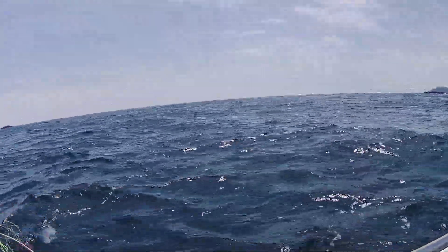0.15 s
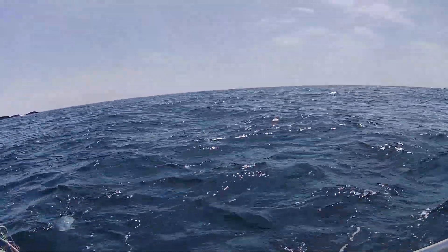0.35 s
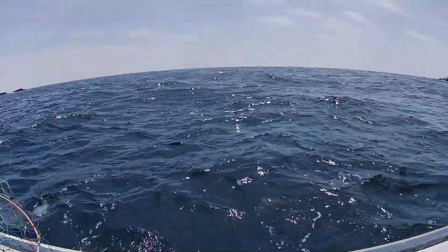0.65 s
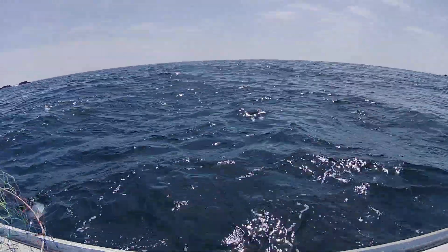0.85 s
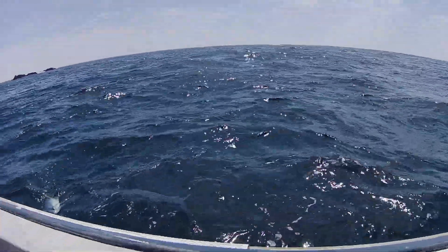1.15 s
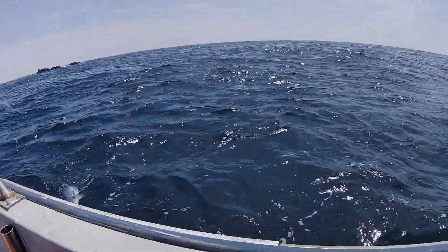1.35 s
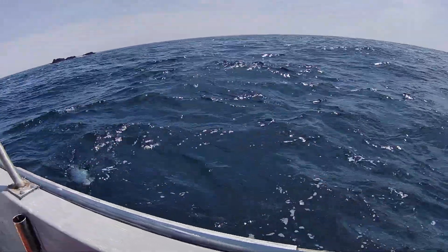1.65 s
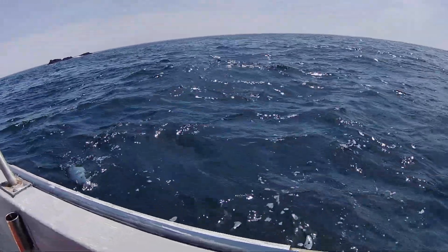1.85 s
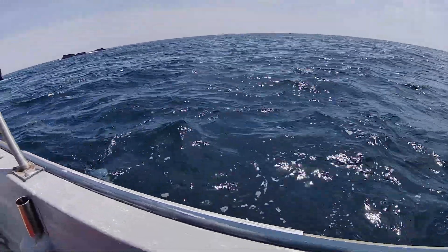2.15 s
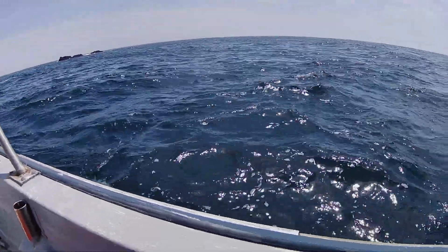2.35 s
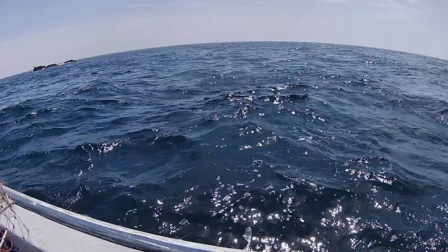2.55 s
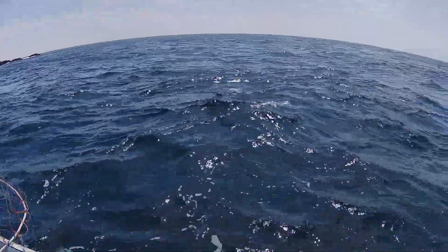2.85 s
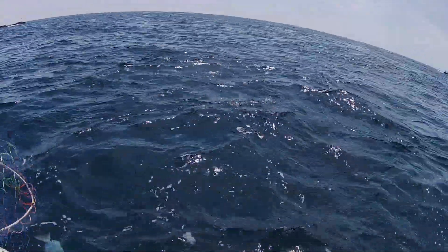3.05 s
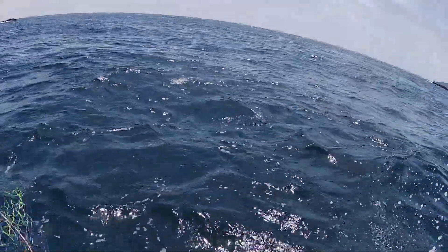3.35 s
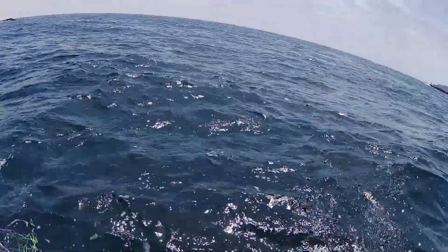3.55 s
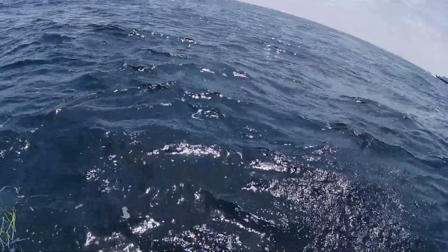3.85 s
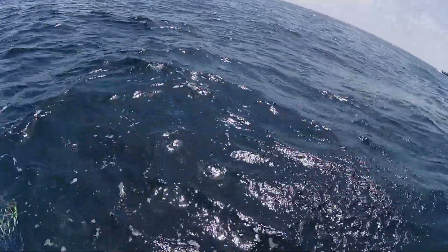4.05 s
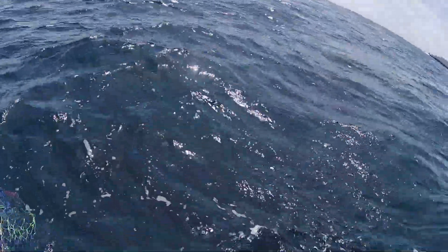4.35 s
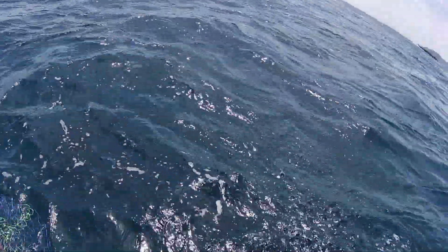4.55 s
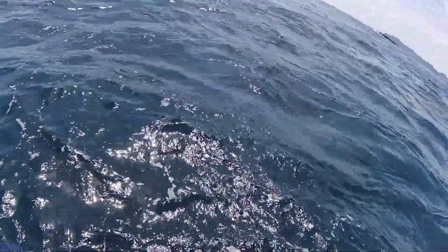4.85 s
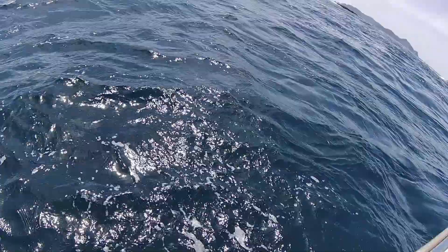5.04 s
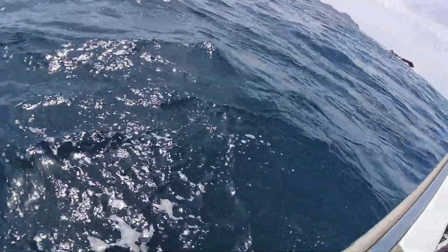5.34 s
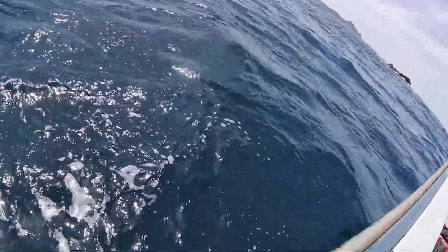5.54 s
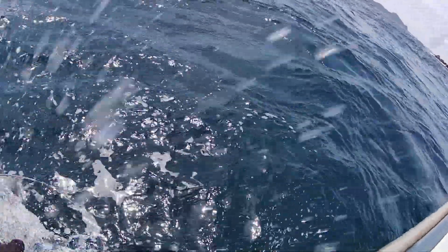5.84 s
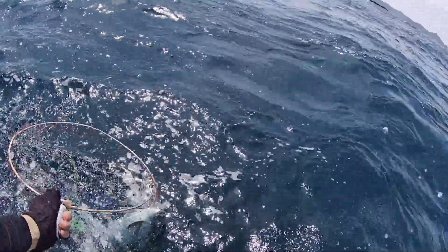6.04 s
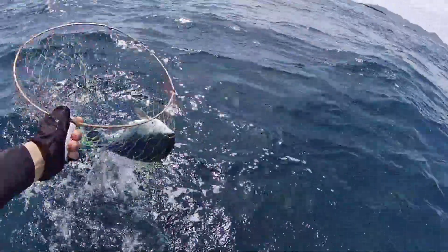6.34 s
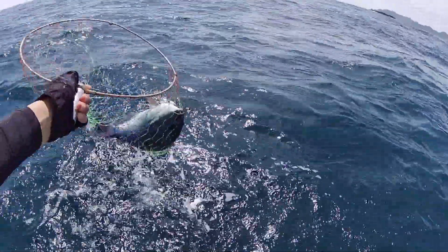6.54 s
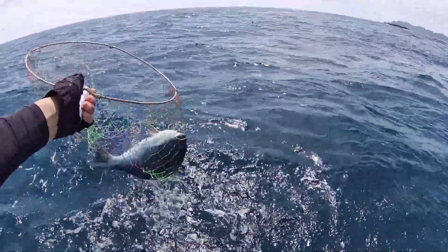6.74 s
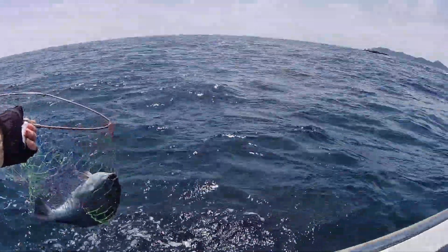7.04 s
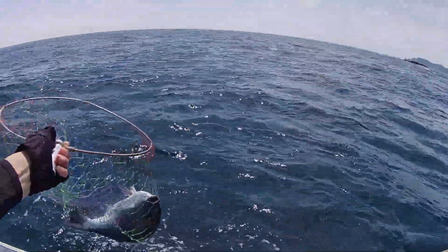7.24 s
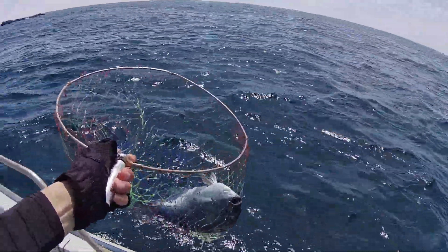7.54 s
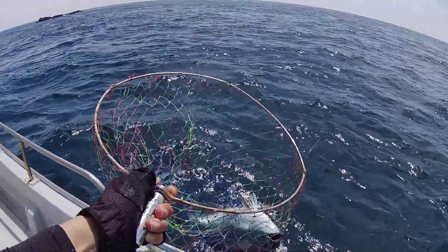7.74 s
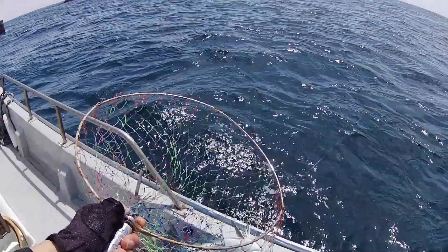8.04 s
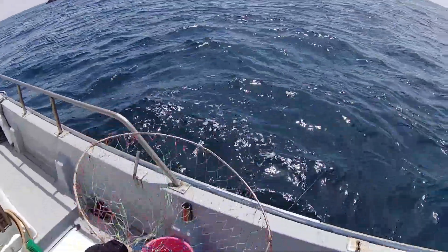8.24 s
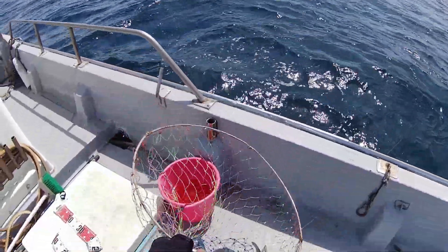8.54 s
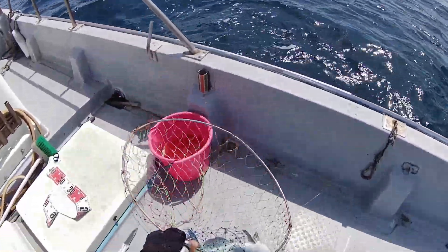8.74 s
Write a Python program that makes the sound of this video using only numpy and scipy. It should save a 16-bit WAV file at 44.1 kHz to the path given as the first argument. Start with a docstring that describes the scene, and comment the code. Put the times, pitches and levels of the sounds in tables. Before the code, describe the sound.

Close, muffled sound from a microphone worn on the body aboard a small boat. It starts with fairly quiet lapping and a few thuds, then harder slaps, plopping bubbles and a strong knock after four seconds. A crackling run of clicks and rustle comes at five, then wind buffeting, a splash and crisp water drops at six. Later come a loud snap with scraping cloth, softer sloshing and low footfalls.

```python
"""A small boat on a choppy sea, heard by a camera worn on the body: waves slap and gurgle along the hull,
a fish thrashes in a landing net, wind and shifting feet rumble. Cloth rubs and creaks on the camera's housing,
which rings in its own fixed resonances over the hiss of the microphone."""
import sys
import numpy as np
from scipy.fft import rfft, irfft, next_fast_len
from scipy.io import wavfile
from scipy.ndimage import uniform_filter1d, map_coordinates

SR = 44100
rng = np.random.default_rng(int(sys.argv[2]) if len(sys.argv) > 2 else 0)


def transcribe(signal):
    """Save signal, clipped to [-1, 1], as a 16-bit WAV file at the path in sys.argv[1]."""
    frames = np.atleast_2d(signal).T
    limited = np.clip(frames, -1, 1)
    pcm = np.round(limited * 32767).astype(np.int16)
    wavfile.write(sys.argv[1], SR, pcm)


N = 392049

# sharp snaps on the housing: (s, peak dB, low part dB, treble part dB)
SNAPS = [(1.996, -45, 6, -30), (2.027, -40, -18, -30), (2.085, -41, -6, -22), (2.125, -18.5, -29, -47),
         (2.2397, -40, -13, -33), (2.8554, -39, -13, -27), (3.1348, -36, 11, -32), 
         (3.3403, -33, -7, -35), (3.3887, -24.5, -6, -34), (3.65, -32.5, 11.5, -16),
         (3.704, -28, 4, -40), (3.736, -25, -21, -36), (3.755, -32, 8, -34), (3.795, -34, 0, -22), (3.82, -36, 4, -18), (4.185, -38.5, 8, -31),
         (4.357, -23, -26, -41), (4.609, -34.5, 5, -39), 
         (4.778, -35, -21, -19), (4.963, -38, -18, -13), (5.045, -28, -21, -26), (5.0762, -22.5, -23, -9),
         (5.092, -20.5, -30, -10), (5.143, -22, -32, -20), (5.1608, -20, -26, -17), (5.1941, -22, -28, -23),
         (5.2555, -21.5, -20, -26), (5.437, -31, 1, -23), (5.5258, -37.5, -25.5, -33), (5.7726, -32, 6, -40),
         (5.8201, -25, -6, -40), (5.892, -27, -4, -37), 
         (6.4752, -29, -13, -27), (6.5904, -35, -15, -23), (6.837, -38, -14, -14),
         (6.9392, -28.5, -46, -36), (7.072, -29, -30, -27), (7.1871, -16.5, -36, -7),
         (7.7362, -35, 2, -9), (7.774, -27.5, -22, -4), (7.803, -25.5, -25, -9), (7.817, -25, -24, -8),
         (7.8344, -24.5, -20, -6), (7.88, -28.5, -14, -15), (7.94, -28, -6, -26), 
         (8.669, -41, -12, -22)]
# dull blows on the hull: (s, peak dB, pitch Hz, t60 s)
THUMPS = [(0.271, -19.5, 81.5, 0.052), (.91, -36.5, 378, 0.093), (1.352, -28, 119, 0.095), (2.122, -29, 145, 0.18), (2.255, -19.5, 358, 0.096), (2.26, -34, 92, 0.063),
          (2.847, -31, 450, 0.11), (3.036, -14, 152, 0.051), (3.169, -21.5, 185.3, 0.18), (3.846, -17.5, 340, 0.048), (3.897, -22, 351, 0.064),
          (4.385, -9, 408, 0.032), (4.447, -17.5, 195, 0.09), (4.541, -37, 329, 0.5), (4.621, -27.5, 218, 0.21), (4.877, -27.5, 89, 0.12),
          (5.404, -22, 75, 0.13), (5.452, -25.5, 109.6, 0.25), (5.68, -21.5, 124.4, 0.12), (5.763, -22, 81, 0.3),
          (5.836, -16, 402, 0.12), (6.102, -25.5, 407, 0.17), (6.361, -29, 417, 0.11), (7.095, -29.5, 427, 0.09), (7.153, -16.5, 139.6, 0.23), (7.358, -21.5, 113, 0.21),
          (7.427, -21, 85, 0.053), (8.122, -29, 105, 0.066), (8.309, -22, 235, 0.078), (8.541, -29.5, 149, 0.38)]
HISS = [(15, -49), (25, -16), (70, -0.5), (108, -3), (1100, -14.5), (1260, -18.5), (1740, -26.5), (3340, -28), (5570, -32.5),
        (14800, -33.5), (16000, -30)]  # (Hz, dB per Hz)
HISS_DB = -58.5
RUMBLE = [(30, -37), (55, -13.5), (85, 5), (140, -1), (200, -11), (320, -28), (600, -58)]  # (Hz, dB per Hz)
GURGLE = [(100, -13), (200, 2), (350, 2), (600, 0.5), (1000, -7), (1600, -69), (3000, -80)]  # (Hz, dB per Hz)
SPLASH = [(400, 7.5), (900, 4.5), (1250, -0.5), (1600, 2), (2150, -1.5), (2700, -1), (3500, 0), (5000, -11), (6500, -26), (12000, -55), (16000, -28)]  # (Hz, dB per Hz)
CAVITY = [(1251, 130, 0)]  # (Hz, width Hz, dB)
SHELL = [(2680, 580, -4), (3430, 365, 3.5), (3692, 370, 3), (4350, 860, -9)]  # (Hz, width Hz, dB)
HOUSING = [(2270, 440, 5.5), (3570, 440, -1.5), (4260, 770, 5.5), (5010, 740, 9.5), (7940, 600, 6.5), (9280, 1450, 0),
           (11300, 290, 4.5), (12800, 650, 2), (14600, 1500, -1.5)]  # (Hz, width Hz, dB)
TOP_HZ = 15750  # fixed
# plops of trapped air: (s, peak dB, pitch Hz, t60 s)
PLOPS = [(1.355, -38, 580, 0.016), (1.836, -44, 1420, 0.034), (1.834, -49, 2590, .05), (1.86, -45.5, 2740, .025), (2.002, -35.5, 1450, 0.015), (2.088, -39, 1340, 0.023),
         (2.125, -22, 1410, 0.032), (2.238, -27, 523, 0.065), (3.036, -29, 540, 0.025), (3.056, -35, 907, 0.063),
         (3.37, -26, 1490, 0.029), (3.377, -26, 1910, 0.017), (3.671, -33, 2420, .015), (3.715, -30, 3700, .012), (3.794, -32, 3400, .015), (3.832, -17.5, 590, 0.0053), (4.333, -39, 1630, 0.034),
         (4.356, -24, 1464, 0.04), (5.907, -26, 1740, 0.029), (6.217, -35.5, 1310, 0.069), (6.255, -36, 1130, 0.044),
         (6.356, -32, 1740, 0.047), (6.406, -36, 1356, 0.051), (6.593, -37, 1550, 0.067), (7.334, -23, 1120, 0.01), (8.772, -46.5, 800, 0.033), (8.83, -42.5, 675, 0.044), (2.124, -14.5, 2070, 0.0095), (2.16, -37, 2800, 0.017), (2.2388, -41, 2010, 0.025),
                         (2.2534, -43, 1990, 0.028), (3.7623, -29, 2990, 0.031), (5.9298, -30, 3100, 0.022),
                         (6.5929, -31, 2250, 0.015), (2.046, -38.5, 3060, 0.019), (4.378, -30, 1390, 0.036), (4.384, -38, 3500, .025), (4.413, -27, 2460, .03), (4.63, -31, 3360, 0.014),
         (5.915, -28, 2710, 0.021), (5.964, -28, 4600, 0.012), (5.982, -35, 1660, .03), (6.157, -34.5, 1900, 0.021),
         (6.307, -38, 3000, 0.033), (6.332, -33, 3100, .025), (6.54, -40, 1570, .04), (6.788, -44, 1620, 0.037), (6.806, -45, 2380, 0.039)]
# bubbles that climb in pitch near the surface: (s, peak dB, first Hz, last Hz, length s)
RISERS = [(3.646, -46, 940, 1590, 0.0088), (3.652, -42, 1540, 2000, 0.014), (5.897, -34.5, 510, 775, 0.03), (6.01, -37, 578, 734, 0.031), (6.63, -47, 470, 1066, 0.048), (6.745, -46, 1480, 1654, 0.039)]
# drops ticking on the hoop of the net: (s, peak dB, pitch Hz)
TICKS = [(5.915, -29, 8420), (6.064, -14, 9300), (6.0682, -7, 8840), (6.073, -17, 5960), (6.081, -11, 10460),
         (6.301, -34, 12500), (6.701, -40, 8800), (6.771, -44, 14700), (6.857, -42, 14000)]
# fine spray off the net: (s, level dB, level of the lower fizz dB)
SPRAY = [[(3.6, -68, -80), (3.7, -73, -80), (3.82, -60, -66), (3.9, -76, -80)],
         [(5.82, -66, -66), (5.92, -60, -61), (6.12, -58, -69), (6.25, -63, -70), (6.36, -63, -54), (6.43, -59, -53), (6.46, -70, -66), (6.6, -70, -75), (6.9, -75, -84)]]
FIZZ = [[(7700, 910, 4.5), (13000, 890, 4)], [(11500, 2000, 4), (14300, 2000, 2)]]  # one colour a shower: (Hz, width Hz, dB)
FIZZ_LOW = [(5950, 1100, 0)]  # (Hz, width Hz, dB)
# wind pressing on the microphone: (s, buffet dB)
WIND = [(0.0, -64), (0.3, -61), (0.59, -63), (1.93, -67), (2.25, -52), (2.65, -76), (3.12, -48), (4.18, -87),
        (4.51, -58), (4.75, -66), (4.9, -49), (5.22, -51), (5.4, -50), (5.84, -40.5), (6.0, -50),
        (6.86, -78), (7.87, -51), (8.1, -65), (8.89, -62)]
BUFFET = [(15, -21), (35, -20), (55, -9), (90, -18), (200, -64)]  # (Hz, dB per Hz)
SKIRT = [(3740, 3600, 0)]  # the shell passes little far from its ring: (Hz, width Hz, dB)
# waves slapping the hull: (s, rise s, hold s, fall s, boom dB, gurgle dB, splash dB)
SLAPS = [(.28, 0.04, 0.025, 0.29, -51, -54.5, -58.5), (.91, 0.023, 0.028, 0.063, -59, -52.5, -77), (1.04, 0.11, 0.013, 0.043, -51.5, -55, -63), (1.36, 0.036, 0.013, 0.079, -42.5, -52, -57), (1.69, 0.15, 0.057, .05, -67, -63, -56.5),
         (1.85, 0.068, 0.012, 0.075, -53, -55, -49.5), (2.0, 0.13, 0.037, 0.18, -51.5, -51, -55), (2.125, 0.0098, 0.0053, 0.057, -47, -40.5, -37.5),
         (2.242, 0.012, 0.0047, 0.055, -31, -32, -47), (2.39, 0.52, 0.027, 0.058, -45.5, -53, -60), (2.86, 0.15, 0.015, 0.31, -50, -47.5, -54.5),
         (3.04, 0.006, 0.035, 0.05, -37.5, -43.5, -45.5), (3.086, .006, .025, .05, -41, -44.5, -40), (3.138, 0.015, 0.039, 0.086, -33, -35, -38.5), (3.38, 0.096, 0.025, 0.12, -44, -71, -40.5),
         (3.65, 0.28, 0.031, 0.15, -47.5, -61, -48.5), (3.755, 0.088, 0.075, 0.29, -51, -47.5, -42), (4.2, 0.075, 0.0099, 0.18, -54, -51, -52.5),
         (4.357, 0.012, 0.073, 0.011, -37, -45, -33.5), (4.44, 0.15, 0.015, 0.17, -37, -48, -47), (4.58, 0.11, 0.082, 0.071, -53.5, -49.5, -59),
         (5.17, 0.19, 0.049, 0.19, -41, -51.5, -72), (5.44, 0.37, 0.058, 0.32, -61, -53, -62),
         (5.762, 0.031, 0.038, 0.017, -57, -42.5, -40.5), (5.823, 0.01, 0.03, 0.1, -52, -35.5, -38),
         (5.892, 0.019, 0.05, 0.5, -48.5, -54, -38.5), (6.12, 0.1, 0.023, 0.081, -67, -42, -54), (6.22, 0.29, 0.053, 0.31, -66, -70.5, -46.5), (6.35, 0.098, 0.18, 0.41, -69, -58, -41),
         (7.11, 0.054, 0.09, 0.094, -37.5, -47.5, -41), (7.33, 0.05, 0.007, 0.034, -55, -64, -47), (7.81, 0.2, 0.033, 0.48, -57, -59.5, -52.5),
         (8.13, 0.059, 0.016, 0.045, -39, -51, -62), (8.3, 0.19, 0.03, 0.28, -45, -59.5, -52.5), (8.56, 0.3, 0.011, 0.094, -46, -54, -67),
         (8.68, 0.072, 0.032, 0.22, -58, -68, -53)]
CALM_DB = [-70, -60.5, -65]  # boom, gurgle and splash between the slaps
BOOM_LAG_S, GURGLE_LAG_S = 0.039, 0.002  # the hull answers after the splash
# strokes of cloth over the housing, with one knock at 2.125 s: (s, rise s, hold s, fall s, cavity dB, creak dB,
# rustle dB)
STROKES = [(.212, .012, .03, .03, -73, -59.5, -86), (.27, .008, 0.044, .06, -70, -53.5, -86), (1.12, 0.1, 0.24, 0.075, -58, -67, -74), (1.85, 0.17, 0.012, 0.076, -67, -58, -85),
           (2.02, 0.18, 0.069, 0.074, -59, -62, -80), (2.125, 0.0066, 0.0038, 0.037, -32, -47, -66), (2.42, 0.12, 0.021, .07, -58, -66, -70),
           (3.06, 0.1, 0.034, 0.086, -51.5, -52, -71), (3.16, 0.051, 0.014, 0.019, -55, -39.5, -60.5), (3.38, 0.037, 0.16, .05, -55.5, -69, -69),
           (3.74, 0.4, 0.065, 0.19, -58, -43.5, -62.5), (3.97, 0.032, 0.076, 0.026, -53.5, -60, -71), (4.358, .015, .01, 0.069, -41, -58, -78),
           (4.42, 0.064, 0.0086, 0.029, -47, -35, -59), (4.64, 0.6, 0.031, 0.04, -58, -53.5, -69), (4.81, 0.041, 0.064, 0.12, -56.5, -58, -67.5),
           (4.965, 0.052, 0.01, 0.094, -50.5, -63, -71), (5.045, 0.015, 0.048, 0.011, -45.5, -41, -53.5), (5.1, 0.086, 0.066, .03, -50.5, -68, -51.5), (5.142, 0.0046, 0.082, 0.031, -38.5, -32.5, -44), (5.254, 0.02, 0.041, 0.15, -41.5, -38, -45),
           (5.42, 0.082, 0.053, 0.088, -51.5, -48, -56.5), (5.61, 0.043, 0.0093, 0.25, -49.5, -48, -63), (5.823, 0.01, .04, .05, -48, -40.5, -61), (5.892, .012, 0.033, 0.12, -49, -42.5, -62),
           (6.066, 0.014, 0.015, 0.098, -47.5, -43.5, -53), (6.218, 0.059, 0.0088, 0.12, -60, -37.5, -57), (6.35, 0.14, 0.0097, 0.19, -45, -42.5, -51.5),
           (6.5, 0.11, 0.07, 0.19, -53, -57, -73), (7.03, 0.017, 0.075, 0.026, -42, -41.5, -65), (7.13, 0.087, 0.093, 0.032, -40.5, -38, -41),
           (7.333, 0.097, 0.0049, 0.02, -52, -56, -62), (7.69, 0.026, 0.079, .1, -53, -63, -78), (7.82, 0.1, 0.032, 0.022, -44, -38.5, -45), (7.876, 0.016, 0.009, .06, -45.5, -54, -49),
           (7.94, 0.026, 0.0053, 0.057, -45, -49, -54.5), (8.25, 0.08, 0.023, 0.074, -47, -44.5, -49), (8.36, 0.19, 0.044, .1, -53, -63, -64), (8.46, 0.076, 0.023, 0.086, -46, -55, -60.5),
           (8.668, 0.071, 0.034, 0.13, -54, -55.5, -61)]
RESTING_DB = [-72.5, -84, -84.5]  # cavity, creak and rustle between the strokes
# light strokes that sing in one high resonance: (s, rise s, hold s, fall s, level dB)
WHISPERS = [(5.04, 0.085, 0.44, .05, -63), (7.72, 0.038, 0.23, .06, -64), (8.2, 0.057, 0.077, .05, -63), (8.35, .05, 0.12, 0.036, -66),
            (8.65, 0.028, 0.068, .015, -60.5)]
# weight shifting on deck, felt as low rumbles: (s, rise s, hold s, fall s, level dB)
FOOTFALLS = [(.29, 0.066, 0.039, 0.16, -40), (1.39, .06, 0.049, 0.1, -51), (2.26, 0.069, 0.013, 0.087, -42.5), (3.19, 0.062, 0.063, 0.14, -38),
             (3.66, 0.23, 0.014, 0.085, -43.5), (4.88, 0.038, 0.49, .1, -46), (5.19, 0.15, 0.019, 0.16, -35.5), (5.41, 0.046, 0.15, 0.28, -47),
             (5.68, 0.079, 0.056, 0.18, -42.5), (5.78, 0.06, 0.052, 0.053, -40.5), (7.35, 0.071, 0.065, 0.13, -34), (7.7, 0.29, 0.084, 0.22, -43.5),
             (8.13, 0.042, 0.028, 0.083, -45.5), (8.5, 0.06, .12, 0.07, -48.5)]
SWELL_DB = -55.5  # the rumble between them
BOOM = [(40, -26), (80, -8.5), (125, -1.5), (190, -1.5), (260, -9.5), (400, -32.5), (600, -59.5)]  # the hull under a slap: (Hz, dB per Hz)
AIRY = [(13400, 10000, 0)]  # hard strokes add air on top: (Hz, width Hz, dB)
HARD_DB, AIR_GROWS = -41.5, 3.8  # rustle level at which the air is as loud; it grows faster than the rustle


def amp(db):
    """Decibels to gain."""
    return 10 ** (np.asarray(db) / 20)


def unit(x):
    """x at rms 1."""
    return x / np.sqrt(np.mean(x ** 2) + 1e-20)  # fixed


def curves(rows):
    """One value per sample for each column after the time."""
    s, *cols = np.transpose(rows)
    return [np.interp(np.arange(N) / SR, s, c) for c in cols]


def wobble(rate):
    """A smooth random curve, rate knots a second."""
    return map_coordinates(rng.standard_normal(int(N * 400 / SR) + 4), [np.arange(N) * min(rate, 400) / SR])  # fixed


def filtered(x, response):
    """x times a complex response of frequency."""
    m = next_fast_len(N + SR // 2)
    return irfft(rfft(x, m) * response(np.fft.rfftfreq(m, 1 / SR)), m)[:N]


def coloured(x, spectrum):
    """x through (Hz, dB) points on a log axis."""
    f, db = np.transpose(spectrum)
    return filtered(x, lambda hz: amp(np.interp(np.log(hz + 1), np.log(f + 1), db)))


def ringing(x, modes):
    """x through a sum of causal resonances."""
    return filtered(x, lambda f: sum((-1) ** k * amp(db) * 1j * f * w / (c * c - f * f + 1j * f * w)
                                     for k, (c, w, db) in enumerate(modes)))


def bubbles(count, mid_hz, spread, cycles, size_db, climb):
    """Damped sines at random moments whose pitch rises as they close; rms 1."""
    draw = rng.random((count, 2))
    hz = mid_hz * np.exp(spread * rng.standard_normal((count, 1)))
    t = np.arange(600) / SR  # fixed
    life = t * hz / cycles
    wave = np.sin(2 * np.pi * hz * t * (1 + climb * life)) * np.exp(-life) * (1 - np.exp(-4 * life))
    wave *= amp(-size_db * np.log(draw[:, :1] + .04))  # fixed
    at = (draw[:, 1:] * N).astype(int) + np.arange(len(t))
    return unit(np.bincount(at.ravel(), wave.ravel())[:N])


def sea():
    """The hull booms under each slap, a wash with large bubbles runs along it, and dense small bubbles splash on noise."""
    boom_db, gurgle_db, splash_db = swells(SLAPS, CALM_DB, [BOOM_LAG_S, GURGLE_LAG_S, 0])
    boom = unit(amp(1.4 * wobble(15)) * coloured(rng.standard_normal(N), BOOM))
    big = bubbles(count=2500, mid_hz=390.4, spread=0.461, cycles=2.5, size_db=4.5, climb=0.032)
    gurgle = unit(coloured(0.34 * big + rng.standard_normal(N) * amp(3.25 * wobble(30)), GURGLE))
    small = bubbles(count=16000, mid_hz=2500, spread=0.45, cycles=3, size_db=2, climb=.03)  # fixed
    drips = bubbles(count=1500, mid_hz=2000, spread=0.35, cycles=6, size_db=3, climb=.025)  # fixed
    froth = rng.standard_normal(N) * amp(2.5 * wobble(200))  # fixed
    splash = unit(coloured(0.7 * small + 0.25 * drips + froth, SPLASH))  # fixed
    return amp(boom_db) * boom + amp(gurgle_db) * gurgle + amp(splash_db - 3.5) * splash


def cloth():
    """Friction noise sings in the cavity, slips in bursts through the shell and rustles in the housing."""
    cavity_db, creak_db, rustle_db = swells(STROKES, RESTING_DB, np.zeros(3))
    slips = wobble(110)  # stick and slip, shared by all three paths
    cavity = ringing(ringing(rng.standard_normal(N) * amp(0.56 * slips), CAVITY), [(1371, 143, 0)])
    creak = ringing(rng.standard_normal(N) * amp(3.6 * slips + 2.5 * wobble(30)), SHELL)  # fixed
    creak = ringing(creak, SKIRT)
    rustle = ringing(rng.standard_normal(N) * amp(0.21 * slips + 2.1 * wobble(300)), HOUSING)
    air = amp(HARD_DB + AIR_GROWS * (rustle_db - HARD_DB)) * unit(ringing(ringing(rng.standard_normal(N), AIRY), AIRY))
    return air + amp(cavity_db - 3.0) * unit(cavity) + amp(creak_db - 3.5) * unit(creak) + amp(rustle_db + 0.5) * unit(rustle)


def snaps():
    """Each snap is a sharp puff of noise with a softer tail, in shell, mid range and treble."""
    t = np.arange(SR // 20) / SR
    fade = amp(-60 * t / 0.0055) + amp(-6.5 - 60 * t / 0.02)
    fade = fade * (1 - np.exp(-t / 0.00062))
    low, mid, high = np.zeros((3, N + SR))
    for s, db, low_db, high_db in SNAPS:
        puff = rng.standard_normal((3, len(t))) * amp(db) * fade
        at = round(s * SR)
        low[at:at + len(t)] += amp(low_db + 7.0) * puff[0]
        mid[at:at + len(t)] += amp(12) * puff[1]
        high[at:at + len(t)] += amp(high_db + 5.0) * puff[2]
    treble = ringing(ringing(high[:N], HOUSING), [(10800, 3800, 0)])
    return ringing(low[:N], [(1730, 420, 0)]) + ringing(ringing(mid[:N], SHELL), SKIRT) + treble


def thumps():
    """Each blow rings the hull plank briefly, with a weaker unsteady overtone."""
    out, t = np.zeros(N + SR), np.arange(SR // 3) / SR
    for s, db, hz, t60 in THUMPS:
        turn = rng.random(2)
        ring = np.sin(2 * np.pi * hz * t) + 0.088 * np.sin(2 * np.pi * (hz * (2.3 + .5 * turn[0]) * t + turn[1]))
        out[round(s * SR):][:len(t)] += amp(db - 6.5 - 60 * t / max(t60, .02)) * (1 - np.exp(-t / 0.003)) * ring
    return out[:N]


def plops():
    """Air pockets ring once and die; free bubbles glide upward."""
    out, t = np.zeros(N + SR), np.arange(SR // 10) / SR
    shaken = lambda: 1 + .3 * uniform_filter1d(rng.standard_normal(len(t)), size=120) * np.sqrt(120)  # fixed: the surface shakes a bubble
    for s, db, hz, t60 in PLOPS:
        out[round(s * SR):][:len(t)] += amp(db - 60 * t / max(t60, .005)) * (1 - np.exp(-t / 0.00049)) * shaken() * np.sin(2 * np.pi * hz * t)
    for s, db, first_hz, last_hz, length in RISERS:
        u = np.minimum(t / length, 1)
        turns = np.cumsum(first_hz * (last_hz / first_hz) ** u) / SR
        out[round(s * SR):][:len(t)] += amp(db) * shaken() * np.sin(np.pi * u) * np.sin(2 * np.pi * turns)
    return out[:N]


def ticks():
    """A bright tick: a short ring at the drop's pitch with a burst of treble noise."""
    out, t = np.zeros(N + SR), np.arange(SR // 50) / SR
    for s, db, hz in TICKS:
        ring = np.sin(2 * np.pi * hz * t) + 1.24 * rng.standard_normal(len(t))
        out[round(s * SR):][:len(t)] += amp(db - 7.5 - 60 * t / 0.0064) * (1 - np.exp(-t / 0.00019)) * ring
    return ringing(out[:N], [(10200, 5700, 0)])


def spray():
    """Spiky droplet noise in the resonances of each shower over a lower fizz, silent between the showers."""
    out, t = np.zeros(N), np.arange(N) / SR
    for rows, fizz in zip(SPRAY, FIZZ):
        drops = rng.standard_normal((2, N)) * amp(3.5 * wobble(400) + 2.5 * wobble(45))  # fixed
        high, low = (unit(ringing(ringing(d, m), m)) for d, m in zip(drops, (fizz, FIZZ_LOW)))
        db, low_db = curves(rows)
        out += ((t > rows[0][0]) & (t < rows[-1][0])) * (amp(db) * high + amp(low_db) * low)
    return out


def wind():
    """Slow turbulence shakes the membrane."""
    return amp(curves(WIND)[0]) * unit(amp(5.4 * wobble(19)) * coloured(rng.standard_normal(N), BUFFET))


def whisper():
    """Smooth friction noise through a narrow band of the housing."""
    band = [(4950, 460, 0)]
    level_db, = swells(WHISPERS, [-120], [0])  # fixed
    return amp(level_db) * unit(ringing(ringing(rng.standard_normal(N), band), band))


def swells(rows, rest_db, lags):
    """One level in dB per column: each event gains 20 dB over its rise, holds, loses 20 dB over its fall; powers add."""
    s, rise, hold, fall, *cols = np.abs(np.transpose(rows))[..., None] + 1e-4  # fixed
    t = np.arange(0, N / SR, .002)  # fixed
    levels = []
    for db, rest, lag in zip(cols, rest_db, lags):
        away = np.maximum(s + lag - t, 0) / rise + np.maximum(t - s - lag - hold, 0) / fall
        power = amp(2 * rest) + amp(-2 * (db + 20 * away)).sum(axis=0)
        levels.append(np.interp(np.arange(N) / SR, t, 10 * np.log10(power)))
    return levels


def deck():
    """Lumpy low rumble through the deck."""
    level_db, = swells(FOOTFALLS, [SWELL_DB], [0])
    return amp(level_db) * unit(amp(1.6 * wobble(28)) * coloured(rng.standard_normal(N), RUMBLE))


def scene():
    """Everything that reaches the microphone."""
    hiss = amp(HISS_DB) * unit(coloured(rng.standard_normal(N), HISS))
    return (sea() + deck() + wind() + cloth() + snaps() + thumps() + plops() + ticks() + spray() + whisper() + hiss)[None]


def record(dry):
    """The camera keeps nothing above its band limit."""
    return filtered(dry[0], lambda hz: 1 / (1 + (hz / TOP_HZ) ** 500))[None]  # fixed


dry = scene()
out = record(dry)
transcribe(out)
```